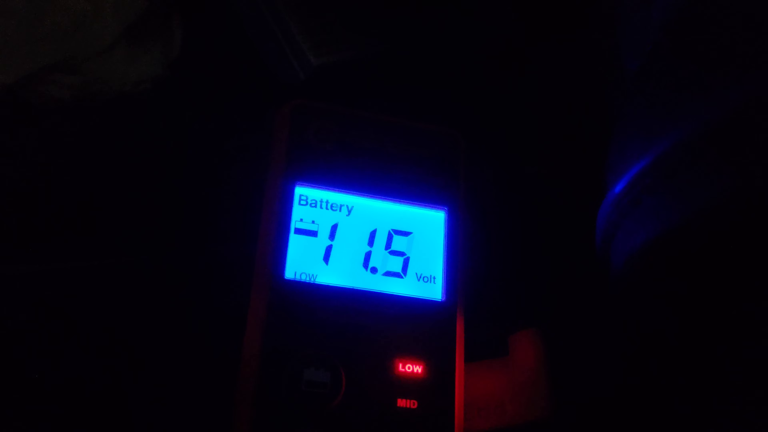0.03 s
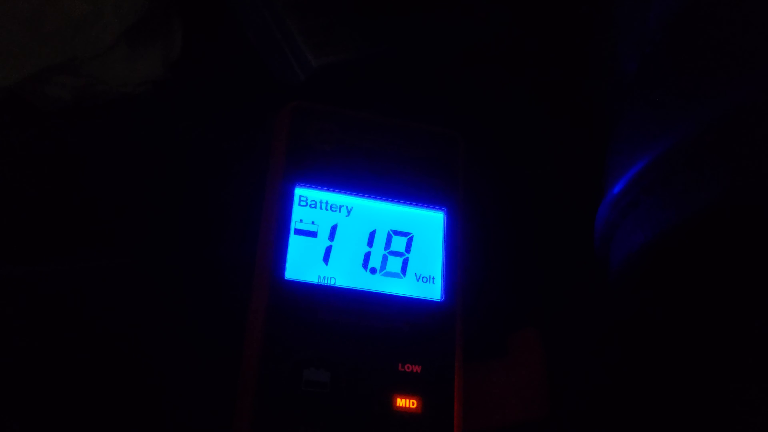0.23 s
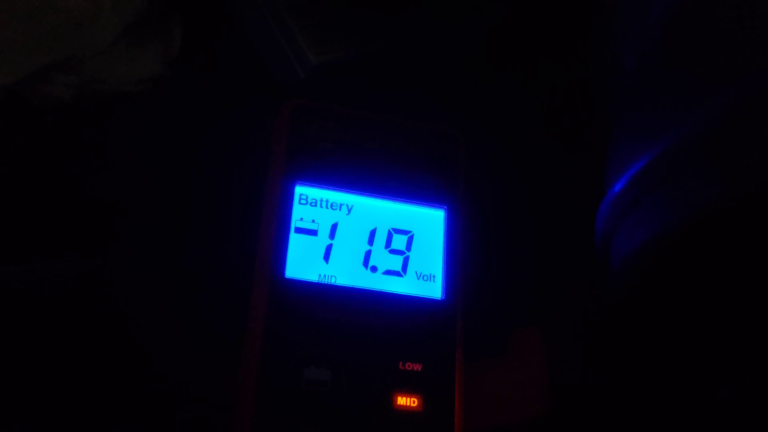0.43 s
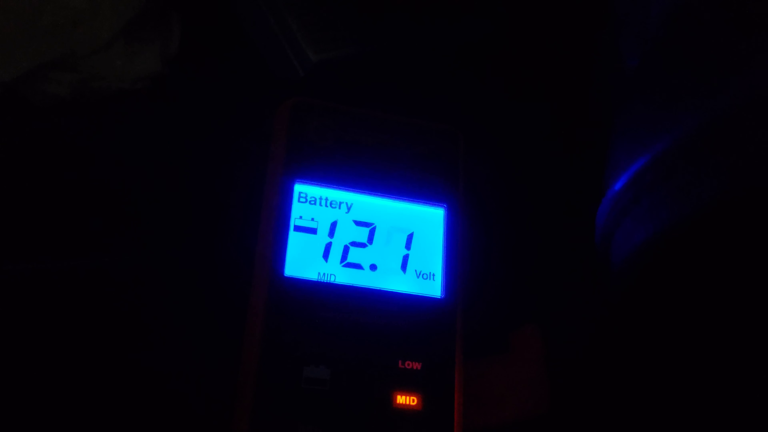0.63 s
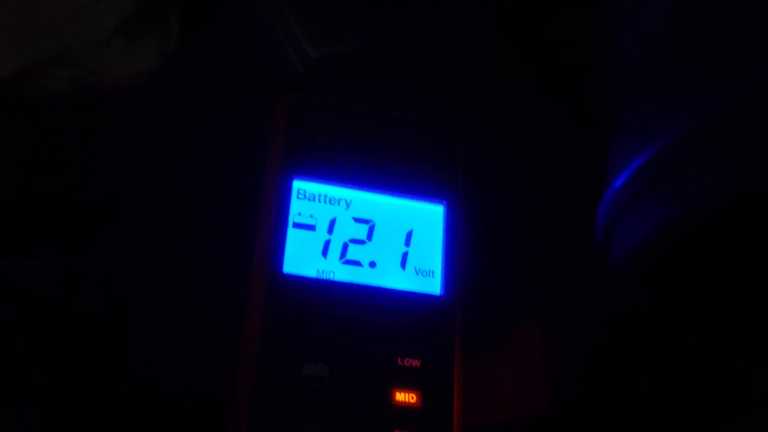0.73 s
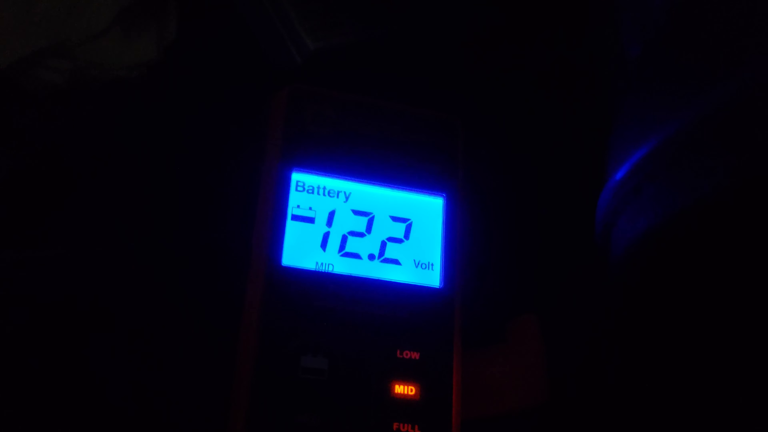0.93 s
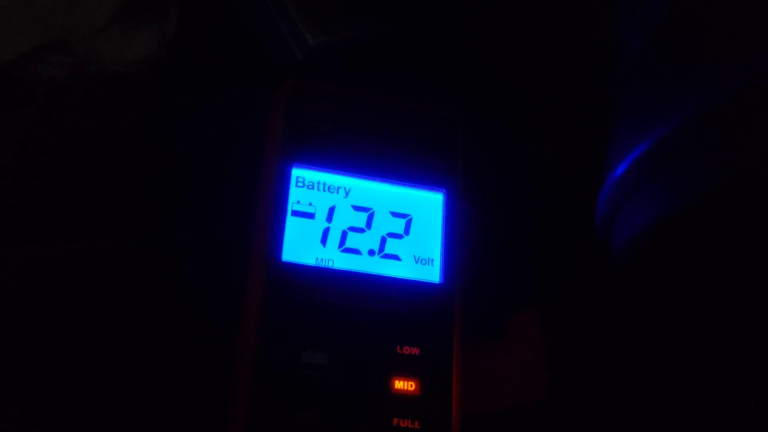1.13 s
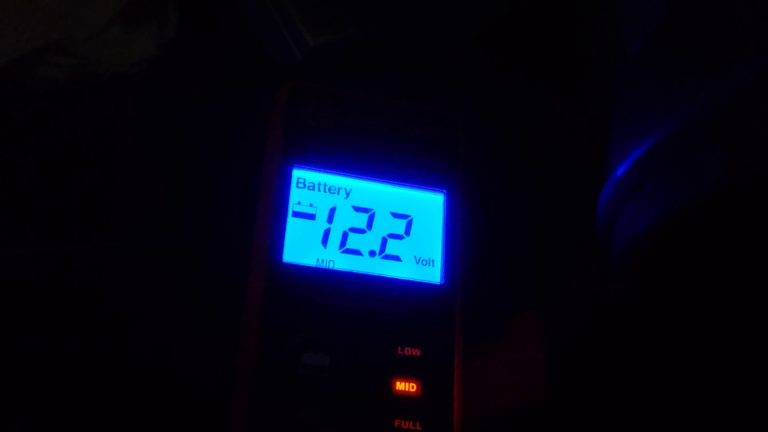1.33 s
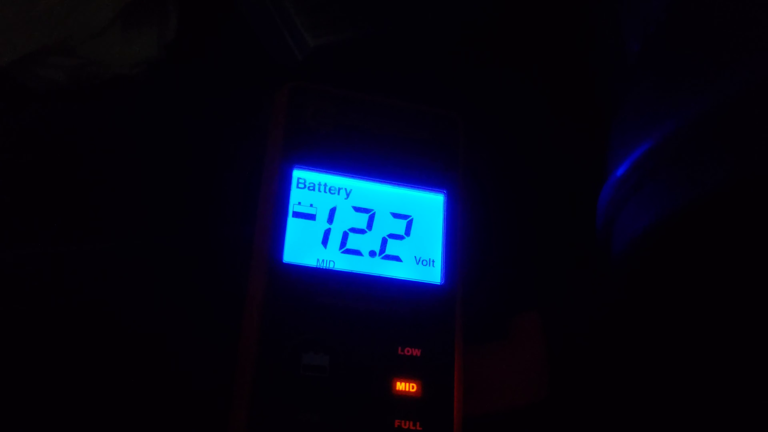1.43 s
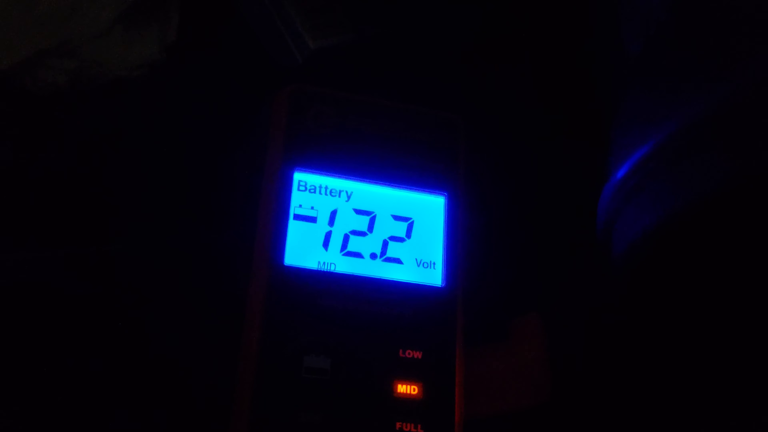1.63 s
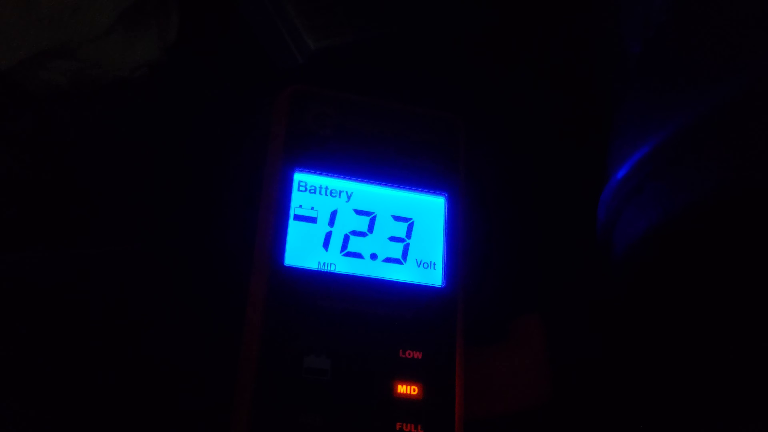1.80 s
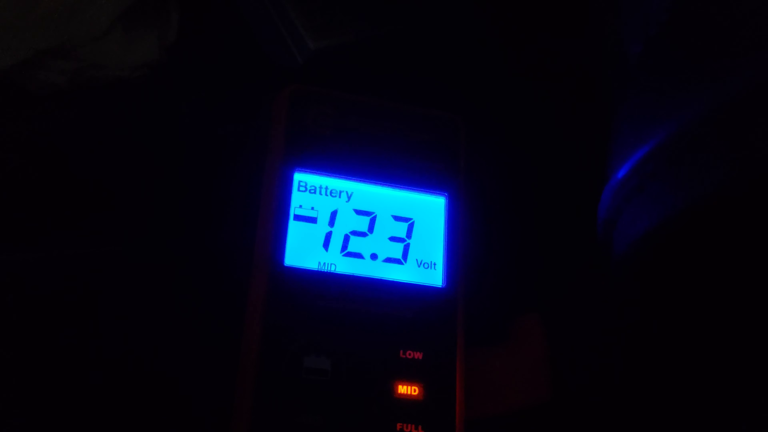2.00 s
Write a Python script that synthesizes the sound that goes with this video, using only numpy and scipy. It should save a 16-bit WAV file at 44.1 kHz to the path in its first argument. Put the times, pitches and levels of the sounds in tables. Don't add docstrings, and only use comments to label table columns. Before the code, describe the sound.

A just-started car engine hums low and settles to a slower idle, heard inside the cabin. A sharp plastic key clack comes at the start, then faint cloth rustle and tiny ticks, close stereo microphone.

```python
import sys
import numpy as np
from scipy import signal
from scipy.fft import rfft, irfft
from scipy.io import wavfile
from scipy.ndimage import uniform_filter1d

SR = 44100
rng = np.random.default_rng(int(sys.argv[2]) if len(sys.argv) > 2 else 0)


def dump_mix(stems):
    frames = np.atleast_2d(stems).T
    limited = np.clip(frames, -1, 1)
    pcm = np.round(limited * 32767).astype(np.int16)
    wavfile.write(sys.argv[1], SR, pcm)


def to_linear_factor(level_db):
    exponent = np.asarray(level_db, float) / 20
    return 10 ** exponent


N = 90801

# (time [s], firing rate [Hz], boom level [dB])
ENGINE = [(0.0, 48.37, -35.5), (0.23, 47.65, -40.5), (0.38, 46.48, -38.5), (0.45, 45.58, -37.5),
          (0.56, 44.89, -34.5), (0.64, 44.52, -36), (0.81, 43.76, -39.5), (0.84, 43.16, -48.5),
          (0.891, 42.58, -42.5), (1.051, 40.36, -63), (1.081, 40.22, -45), (1.21, 39.22, -66),
          (1.231, 38.96, -48), (1.4, 37.98, -48), (1.44, 37.43, -40), (1.74, 34.86, -35.5),
          (2.05, 32.84, -48), (2.06, 32.92, -47)]
# (multiple of firing rate, level [dB]); a shaft order lies half a step under each
HARMONICS = [(2, 3.5), (3, -1.5), (4, 1), (5, 0), (6, 3), (7, -5), (8, -7.5), (9, -12), (10, -8), (12, 0)]
# (frequency [Hz], width [Hz], level [dB])
CABIN = [(91, 14, -2.5), (127, 20.06, 0.5), (173.1, 3.8, -3), (212.8, 15, 1.5), (239, 6.1, 1),
         (286.7, 44, 0), (314, 18, -10), (333, 29, -9.5), (460, 150, -20), (564, 80, -10)]
# (frequency [Hz], width [Hz], depth [dB])
DEAD_SPOTS = [(197, 7, -8), (229, 8, -13), (256, 11, -10), (300, 10, -4)]
ORDERS_DB, HALF_ORDER_DB, ORDER_SWELL_DB = -48.5, -7.5, 2.5
RATE_WANDER, UNEVEN_FIRING, ORDER_SLIP_RAD, BOOM_LEAD_RAD = 0.0043, 0.043, 0.75, 0.08

# (frequency [Hz], density [dB per Hz])
CLATTER = [(300, -22), (600, 6.5), (800, -5.5), (1100, -13), (1900, -16), (2600, -25.5), (5000, -41.5)]
# (frequency [Hz], density [dB per Hz])
STARTER = [(400, -23.5), (800, 9.5), (2000, 0.5), (3000, -5), (4000, -24), (8000, -44.5)]
# (frequency [Hz], left minus right [dB])
CENTRED = [(20, 0), (9000, 0)]
CLATTER_DB, CLATTER_DB_PER_HZ, FIRING_GATE = -67, 0.82, 0.3
STARTER_DB, STARTER_T60_S = -61, 0.93

# (time [s], level [dB], rise [s], decay [s], brightest [Hz])
CLACKS = [(0.0484, -61, 0.003, 0.11, 4000), (0.054, -55, 0.0006, 0.11, 12020),
          (0.0623, -48.5, .0005, 0.05, 12300), (0.0672, -47.5, .0006, 0.11, 7500),
          (0.080, -37, 0.0028, 0.046, 9004), (0.0857, -24, 0.0006, 0.05, 3980),
          (0.0863, -6.5, 0.0012, 0.019, 11930), (0.0915, -16.5, 0.0006, 0.016, 13000),
          (0.092, -19, 0.0005, 0.024, 8880), (0.096, -24, 0.0005, 0.035, 6100),
          (0.1005, -33, .0006, 0.024, 3498), (0.1135, -35, .0004, 0.0058, 9000),
          (.117, -44, .002, 0.047, 12010), (0.1287, -33, .0006, 0.033, 14000),
          (0.1316, -34.5, .001, 0.024, 13500), (0.14, -46.5, .001, 0.014, 5000)]
# (time [s], level [dB], rise [s], decay [s], brightest [Hz])
TICKS = [(0.8716, -47, 0.0003, 0.0095, 15100), (0.8714, -55.5, 0.0002, 0.005, 10700),
         (0.8715, -55.5, 0.00012, 0.006, 5640), (.875, -62.5, .003, 0.089, 14080),
         (0.9972, -51.5, .0002, 0.018, 12800), (0.9973, -54, 0.0002, 0.012, 4440),
         (1.002, -59, .002, 0.05, 12000), (1.384, -66, .0003, 0.022, 5050),
         (1.541, -49, 0.00035, 0.019, 10600), (1.541, -65.5, 0.00034, 0.0085, 5000),
         (1.544, -62.5, 0.0025, 0.071, 9800), (1.656, -67, .0003, 0.013, 1600)]
# (frequency [Hz], density [dB per Hz])
PLASTIC = [(1300, -7), (2450, -6), (3800, -1.5), (5400, -14.5), (7000, -7.5), (9300, -12.5), (11500, -1),
           (15800, -5)]
# (frequency [Hz], left minus right [dB])
PLASTIC_PAN = [(300, 1), (640, 3.5), (1400, -2), (3100, 2.5), (5000, 11), (7200, 17.5), (11500, -1),
               (15000, 5.5)]
# (frequency [Hz], level [dB], t60 [s])
BARREL = [(2880, -27.5, 0.05), (3530, -20, 0.061), (4000, -11.5, 0.044), (4570, -5, 0.12),
          (6450, -33, 0.055), (7298, 0, 0.054), (9200, -23, 0.06), (11180, -12, 0.052),
          (10600, -6.5, 0.047), (11120, 0, 0.15), (12120, 6.5, 0.0058), (14240, -7, 0.045),
          (13300, -17, 0.067), (14540, 8.5, 0.0087)]
# (frequency [Hz], level [dB], t60 [s])
COLUMN = [(98, -28.5, 0.14), (181, -38, .12), (330, -38, 0.15), (128.9, -29, 0.2), (243.9, -35.5, 0.26),
          (286.6, -33.5, .17), (435.3, -22, 0.066), (468, -24, 0.054), (609, -22, 0.045), (799, -23, 0.037),
          (1076, -29, 0.055), (1626, -27, 0.095), (1940, -28.5, 0.064), (2161, -39, .05)]
# (frequency [Hz], level [dB], t60 [s])
SHANK = [(3040, -36, 0.029), (4846, -38, 0.033), (13450, -40.5, .035)]
CLACK_DB_PER_OCT, TICK_DB_PER_OCT = 2, 20
BARREL_DB, CLACK_SAME, CLACK_LEAD_S = -1.5, 0.32, 0.00033
THUD_S, REBOUND_S, SWELL_CYCLES = 0.0875, 0.1268, 3.6

# (time [s], pressure [dB], dull rub weight [dB], cushion creep [dB])
SLEEVE = [(0.149, -70.5, 1, -81), (0.272, -70.5, -7, -86), (0.335, -62.5, -5.5, -76), (.39, -65, -2, -70),
          (0.521, -60, -3.5, -74), (.61, -63.5, -4.5, -76), (.69, -59, -7, -64.5), (0.801, -60, -8, -68.5),
          (0.846, -71, -12, -68.5), (0.979, -70.5, -12, -69), (1.07, -64.5, -9.5, -76),
          (1.16, -65, -8.5, -91), (1.31, -71.5, -10, -88), (1.4, -68.5, -10, -82.5),
          (1.53, -73.5, -16, -92), (1.63, -78.5, -9, -90), (1.9, -92.5, -5.5, -93)]
# (frequency [Hz], density [dB per Hz])
FABRIC = [(2500, -19.5), (4500, -11.5), (7000, -2), (8700, -10), (10500, -1), (12000, 2.5), (15750, -0.5),
          (16000, -45)]
# (frequency [Hz], left minus right [dB])
FABRIC_PAN = [(60, -6), (150, 1.5), (380, -4), (950, -1.5), (2380, 0), (5980, 22), (15000, 3)]
# (frequency [Hz], density [dB per Hz])
RUB = [(400, -16), (900, -3), (1700, 1), (2600, -0.5), (3600, -4), (5500, -11.5), (9000, -44)]
# (frequency [Hz], density [dB per Hz])
CREEP = [(400, -25), (700, 0), (1200, -0.5), (1900, -4), (2300, -22.5), (4000, -50)]
FIBRES_PER_S, FIBRE_DB, FIBRE_SHARE = 5300, 5, 0.27
FABRIC_SAME, FABRIC_LEAD_S, RUB_DB = 0.45, 0.000446, 3

# (frequency [Hz], density [dB per Hz])
RUMBLE = [(12, -37), (20, -22), (50, 5), (114, -15.5), (208, -16.5), (260, -24), (352, -14), (823, -40),
          (2500, -71.5), (3250, -94), (5500, -120)]
# (frequency [Hz], shared part [0-1])
RUMBLE_SAME = [(60, 0.74), (180, 1), (550, 0.15), (1650, 0.01), (4970, 0.16), (15000, 0.05)]
RUMBLE_DB, RUMBLE_SWELL_DB, RUMBLE_LEAD_S = -45, 1.0, 0.00023
# (frequency [Hz], density [dB per Hz])
HISS = [(1500, -3.5), (2400, -5), (4000, -6), (7000, -12.5), (8700, -18.5), (10500, -6), (12700, -2),
        (15750, -7.5)]
HISS_DB, CEILING, EDGE_HZ = -77.5, 0.7, 16050


def evened(x):
    return x / np.sqrt(np.mean(x ** 2) + 1e-20)


def read(points, hz):
    f, value = np.transpose(points)
    return np.interp(np.log(hz + 1), np.log(f + 1), value)


def add(mix, s, sound):
    part = mix[:, round(s * SR):][:, :sound.shape[1]]
    part += sound[:, :part.shape[1]]


def drift(rate, count):
    f = np.geomspace(0.4, rate, num=16)[:, None]
    t = np.arange(0, N + 256, 256) / SR
    sines = np.sin(2 * np.pi * (f * t + rng.random((count, 16, 1))))
    rows = (sines / np.sqrt(f)).sum(axis=1)
    return np.array([np.interp(np.arange(N) / SR, t, evened(row)) for row in rows])


def flat(x):
    z = rfft(x)
    broad_power = abs(uniform_filter1d(abs(z) ** 2, size=100))
    z = z / np.sqrt(broad_power + 1e-20)
    return evened(irfft(z, len(x))) * np.sqrt(np.mean(x ** 2))


def ports(a, b, colour, same, pan, lead_s):
    hz = np.fft.rfftfreq(len(a), 1 / SR)
    same = np.clip(same, -1, 1)
    left, other = rfft(a), rfft(b)
    right = same * left + np.sqrt(1 - same ** 2) * other
    right = right * np.exp(-2j * np.pi * hz * lead_s)
    tilt_db = read(pan, hz) * np.array([[0.5], [-0.5]])
    z = np.array([left, right]) * to_linear_factor(read(colour, hz) + tilt_db)
    return evened(irfft(z, len(a)))


def cabin(hz):
    return sum(to_linear_factor(db) / np.sqrt(1 + (2 * (hz - f) / w) ** 2) for f, w, db in CABIN)


def dead(hz):
    return to_linear_factor(sum(db * np.exp(-((hz - f) / w) ** 2) for f, w, db in DEAD_SPOTS))


def engine():
    t = np.arange(N) / SR
    s, rate, boom_db = np.transpose(ENGINE)
    hz = np.interp(t, s, rate) * (1 + RATE_WANDER * drift(12, count=1)[0])
    turns = np.cumsum(hz) / SR

    lead = BOOM_LEAD_RAD * np.array([[0.5], [-0.5]])
    strokes = 1 + UNEVEN_FIRING * np.sin(np.pi * turns)
    boom = np.sqrt(2) * to_linear_factor(np.interp(t, s, boom_db)) * strokes * np.sin(2 * np.pi * turns + lead)

    k, db = np.transpose(HARMONICS)[:, :, None]
    k = np.vstack([np.round(k), np.round(k) - 0.5])
    db = np.vstack([db, db + HALF_ORDER_DB])
    swell_db = ORDER_SWELL_DB * drift(5.5, count=len(k))
    level = dead(k * hz) * cabin(k * hz) ** 1.6 * to_linear_factor(db + swell_db)
    slip = ORDER_SLIP_RAD * np.sqrt(k) * drift(8.2, count=len(k))
    phase = 2 * np.pi * (k * turns + rng.random(k.shape)) + slip
    orders = np.array([(level * np.sin(phase + side * k * 0.052)).sum(axis=0) for side in (1, -1)])
    return boom * to_linear_factor([[0.5], [-0.5]]) + to_linear_factor(ORDERS_DB) * evened(orders)


def clatter():
    t = np.arange(N) / SR
    s, rate, _ = np.transpose(ENGINE)
    hz = np.interp(t, s, rate)
    gate = 1 + FIRING_GATE * np.cos(2 * np.pi * np.cumsum(hz) / SR)
    a, b, c, d = rng.standard_normal((4, N)) * gate
    valve_db = CLATTER_DB + CLATTER_DB_PER_HZ * (hz - 41.5) + 0.54 * drift(1.3, count=1)
    valves = ports(a, b, CLATTER, 0.12, CENTRED, 0) * to_linear_factor(valve_db)
    whir = ports(c, d, STARTER, 0.94, CENTRED, 0) * to_linear_factor(STARTER_DB - 60 * t / STARTER_T60_S)
    return valves + whir


def clack(s, db, rise, t60, top_hz, slope_db):
    t = np.arange(8192) / SR
    a, b = rng.standard_normal((2, len(t)))
    ring = sum(to_linear_factor(d - 60 * t / r) * np.sin(2 * np.pi * (f * t + rng.random())) for f, d, r in BARREL)
    ring = ring / np.max(abs(ring))
    shape = np.minimum(t / rise, 1) ** 2 * to_linear_factor(-60 * np.maximum(t - rise, 0) / t60)
    drive = flat(a * shape) + to_linear_factor(BARREL_DB) * ring * 3 * shape

    hz = np.geomspace(300, 17000, num=40)
    away = np.maximum(np.log2(hz / top_hz) * 2, np.log2(top_hz / hz) / 2)
    colour = np.transpose([hz, read([(300, -44.0)] + PLASTIC, hz) - slope_db * away])
    margin = 128
    drive, other = np.roll(drive, margin), np.roll(flat(b * shape), margin)
    out = ports(drive, other, colour, CLACK_SAME, PLASTIC_PAN, CLACK_LEAD_S)
    return s - margin / SR, to_linear_factor(db) * out[:, :len(t) // 4 * 3] * np.sqrt(np.mean(shape ** 2))


def struck(s, modes):
    t = np.arange(12000) / SR
    knock = 0
    for hz, db, t60 in modes:
        swell = np.minimum(t * hz / SWELL_CYCLES, 1)
        knock = knock + to_linear_factor(db - 60 * t / t60) * np.sin(2 * np.pi * hz * t) * swell
    return s, np.array([knock, 1.1 * np.roll(knock, 15)])


def sleeve():
    t = np.arange(N) / SR
    s, db, rub_db, creep_db = np.transpose(SLEEVE)
    a, b, c, d, sign = rng.standard_normal((5, N))
    slip_db = FIBRE_DB * np.minimum(rng.exponential(1, N), 4)
    slips = evened(sign * to_linear_factor(slip_db) * (rng.random(N) < FIBRES_PER_S / SR))
    drive = (1 - FIBRE_SHARE) * a + FIBRE_SHARE * slips
    brush = ports(drive, b, [(600, -40)] + FABRIC, FABRIC_SAME, FABRIC_PAN, FABRIC_LEAD_S)
    rub = ports(c, d, RUB, 0.13, FABRIC_PAN, FABRIC_LEAD_S) * to_linear_factor(RUB_DB + np.interp(t, s, rub_db))
    creep = ports(*rng.standard_normal((2, N)), CREEP, 0.5, CENTRED, FABRIC_LEAD_S)
    creep = creep * to_linear_factor(np.interp(t, s, creep_db))
    pressure_db = np.interp(t, s, db, left=-100, right=-100)
    return creep + (brush + rub) * to_linear_factor(3.5 + pressure_db + 1.0 * drift(25.4, count=1))


def rumble():
    a, b = rng.standard_normal((2, N))
    hz = np.fft.rfftfreq(N, 1 / SR)
    wide = ports(a, b, RUMBLE + [(5000, -84.5)], read(RUMBLE_SAME, hz), CENTRED, RUMBLE_LEAD_S)
    wide = irfft(rfft(wide) * (0.55 + cabin(hz)), N)
    return to_linear_factor(RUMBLE_DB + RUMBLE_SWELL_DB * drift(5.118, count=1)) * evened(wide)


def hiss():
    a, b = rng.standard_normal((2, N))
    colour = [(300, -46.5)] + HISS + [(16000, -50.5)]
    return to_linear_factor(HISS_DB) * ports(a, b, colour, 0.1, [(20, 0.0057), (16000, 0.0065)], 0)


def scene():
    mix = engine() + clatter() + rumble() + sleeve()
    for row in CLACKS:
        add(mix, *clack(*row, CLACK_DB_PER_OCT))
    for row in TICKS:
        add(mix, *clack(*row, TICK_DB_PER_OCT))
    add(mix, *struck(THUD_S, COLUMN))
    add(mix, *struck(REBOUND_S, SHANK))
    return mix


def roll_off(x):
    return signal.sosfilt(signal.butter(12, 17010, fs=SR, output="sos"), x)


def record(dry):
    edge = signal.firwin(255, EDGE_HZ, window=("kaiser", 4), fs=SR)[None]
    overloaded = CEILING * np.tanh((dry + hiss()) / CEILING)
    mix = signal.oaconvolve(overloaded, edge, "same")
    return roll_off(mix)


dry = scene()
out = record(dry)
dump_mix(out)
```